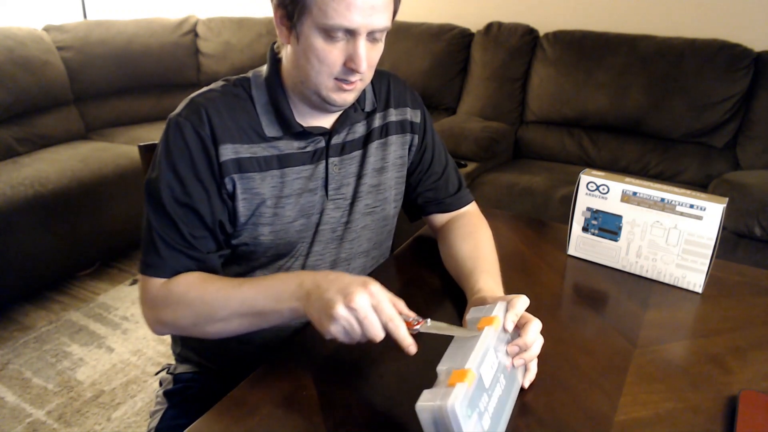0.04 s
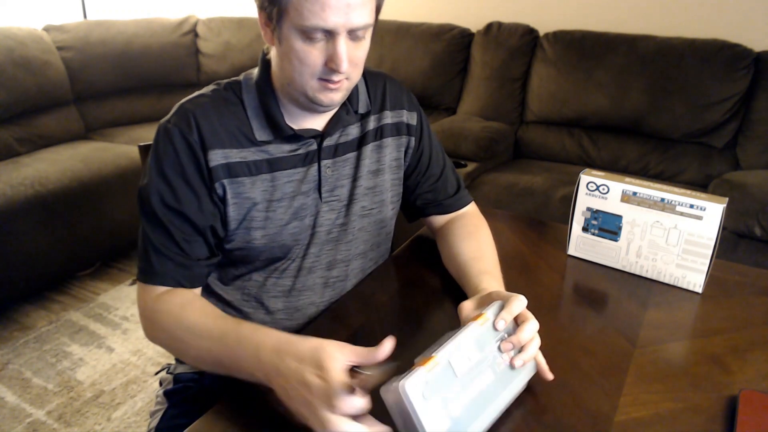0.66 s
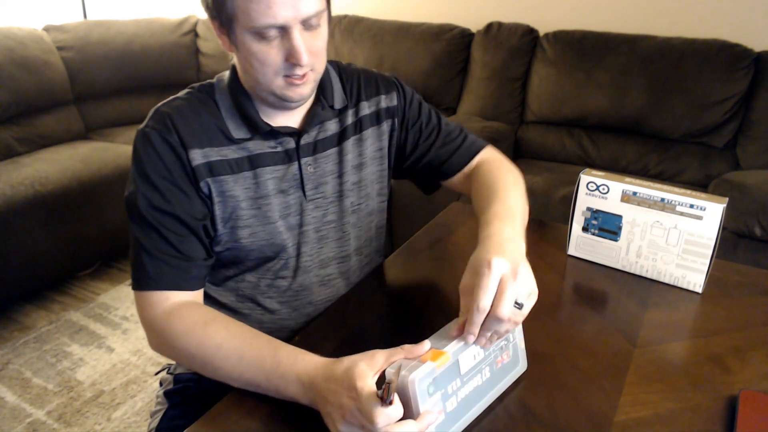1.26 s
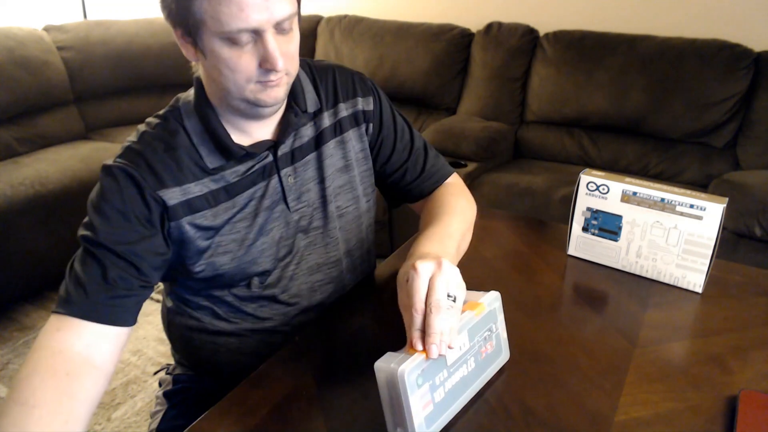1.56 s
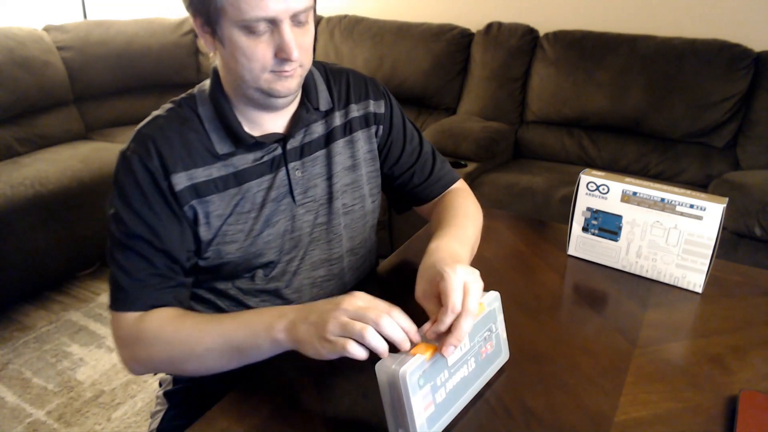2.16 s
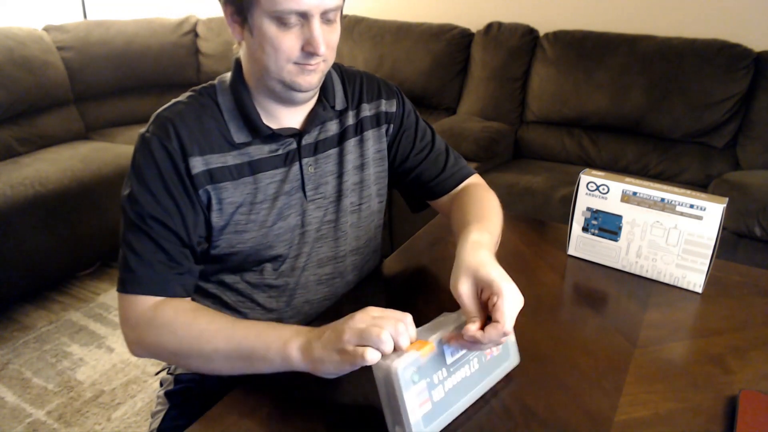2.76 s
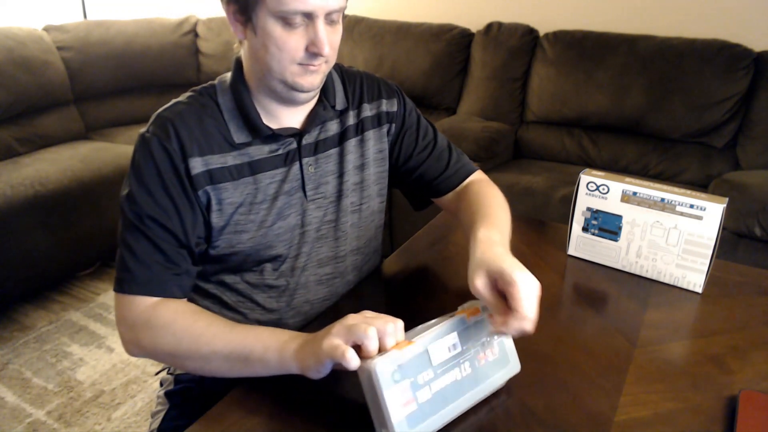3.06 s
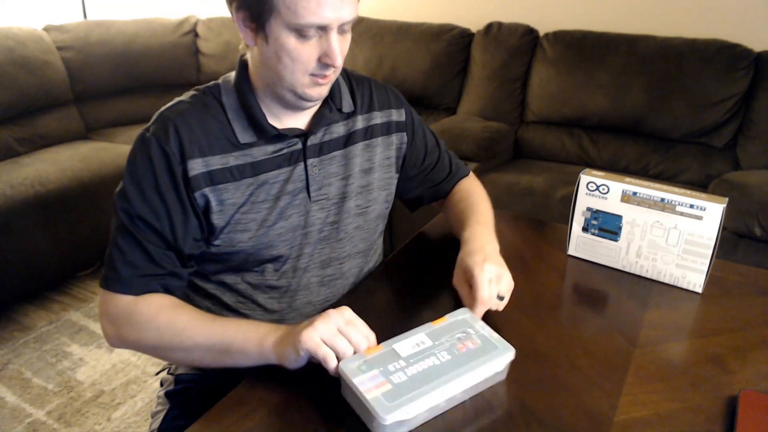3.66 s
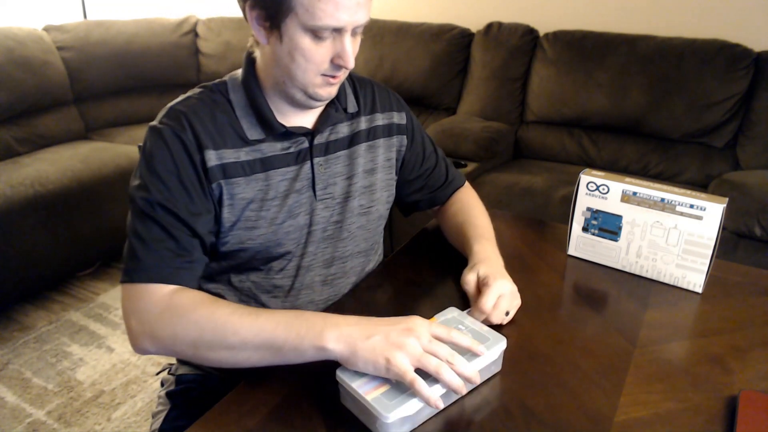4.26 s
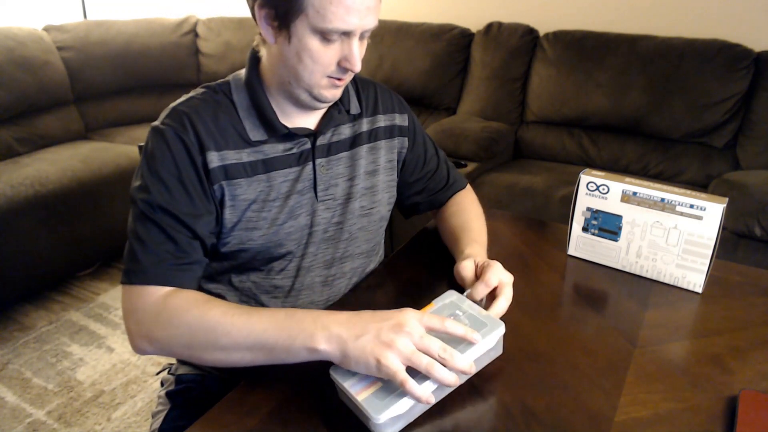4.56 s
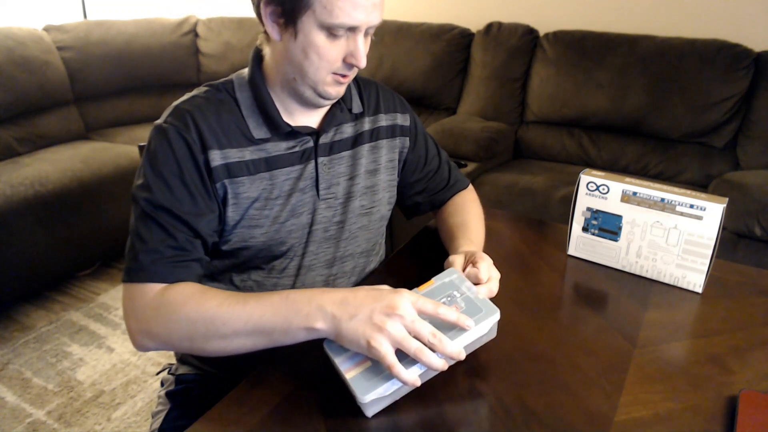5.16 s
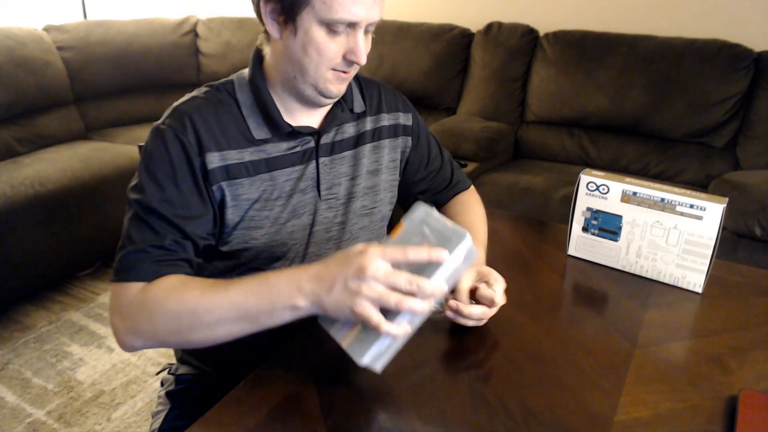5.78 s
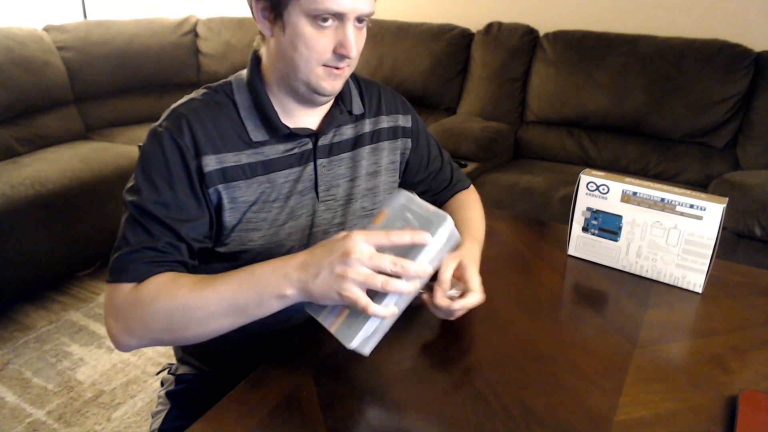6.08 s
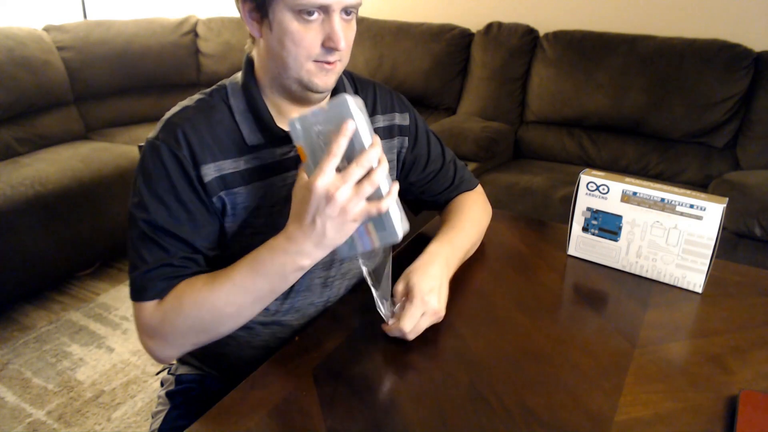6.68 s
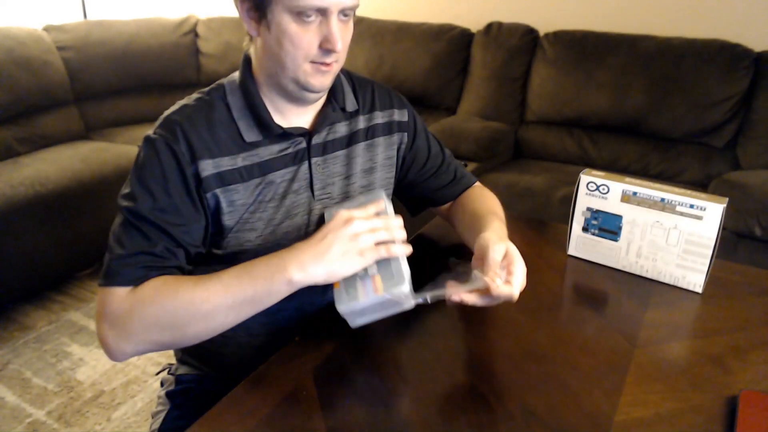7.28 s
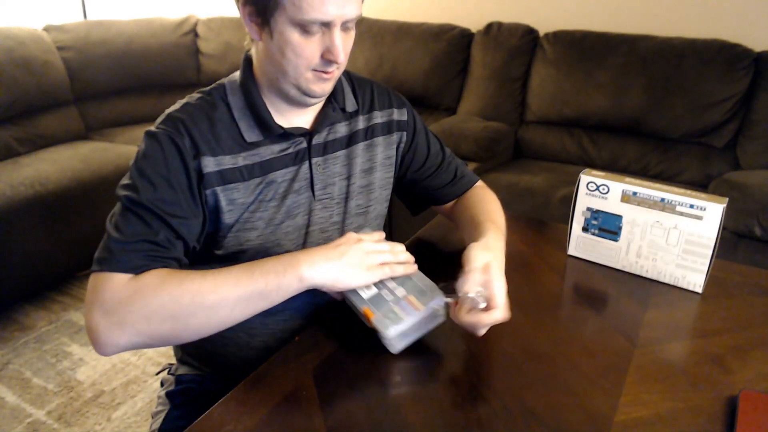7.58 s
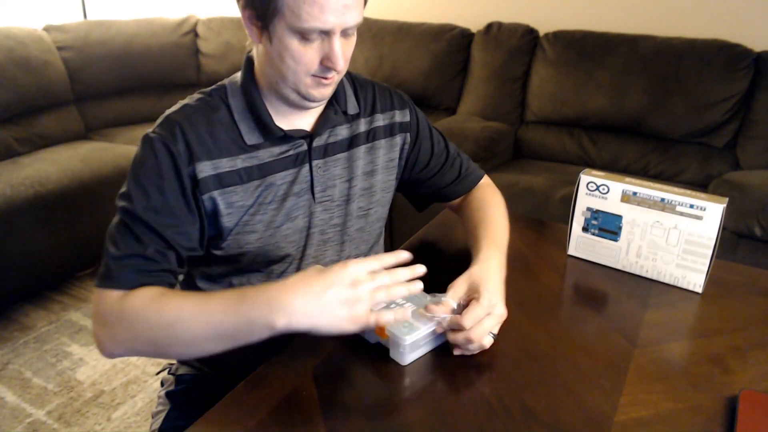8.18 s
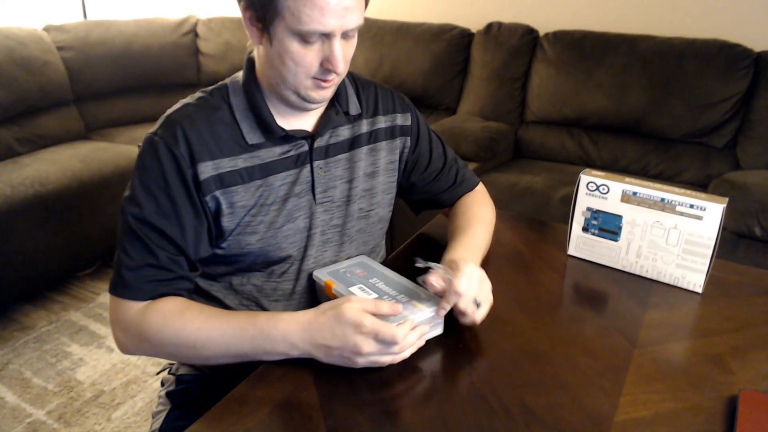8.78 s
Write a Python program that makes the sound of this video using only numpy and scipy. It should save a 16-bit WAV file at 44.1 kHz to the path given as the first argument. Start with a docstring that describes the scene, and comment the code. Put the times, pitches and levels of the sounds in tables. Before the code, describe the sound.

A hard plastic case is handled on a wooden table in a quiet room. It knocks down once, a knife is laid aside with a faint tick, and the stiff shell gives sharp snaps and hollow clacks as it is turned and shoved. In the second half, thin plastic wrapping is peeled off with crackles and short rasps, then crumpled. A low ventilation hum runs underneath, heard in narrow stereo.

```python
"""Unwrapping a plastic case

A hard plastic organizer case knocks and rocks on a wooden table in a living room. Its latches
and walls snap, fingers rub and shove it, and a knife is laid aside with a few light taps.
The clear wrapping is peeled off and crumpled, crackling as its creases flip over.
Two closely spaced microphones hear it all over a low ventilation hum."""
import sys
import numpy as np
from scipy import signal
from scipy.fft import rfft, irfft, next_fast_len
from scipy.io import wavfile
from scipy.ndimage import map_coordinates

SR = 44100
rng = np.random.default_rng(int(sys.argv[2]) if len(sys.argv) > 2 else 0)


def digitize_waveform(pressure):
    """Quantize a signal to 16-bit integers and store it at the path in sys.argv[1].

    Rows of a 2-D input are taken as channels; values are limited to [-1, 1].
    """
    field = np.atleast_2d(pressure).T
    bounded = np.clip(field, -1, 1)
    quanta = np.round(bounded * 32767).astype(np.int16)
    wavfile.write(sys.argv[1], SR, quanta)


N = 398223

# The case lands on the table. Each row: start in seconds, thud pitch in Hz, relative levels in dB of
# the thud, the case's hollow, its wall and its edge, rattle in dB above the first click,
# first bounce time in seconds, loss per bounce in dB.
KNOCKS = [(0.543, 333, -27, -29.5, -29, -39.5, -1, 0.011, 19),
          (0.5762, 146, -13.5, -24.5, -24, -36.5, -9, 0.062, 14.5),
          (1.3592, 326, -37.5, -28, -31, -50, 15, .016, 0.05),
          (3.4034, 200, -28.5, -19, -24.5, -28.5, -6, .0203, 10.5),
          (3.449, 230, -31, -34.5, -33.5, -32.5, -14, 0.04, 5),
          (3.5308, 72, -28, -33.5, -41.5, -46, 18, .02, 8),
          (4.2378, 185, -19, -20.5, -22.5, -34.5, 0, 0.011, 6.5),
          (5.0251, 229, -26, -29.5, -28.5, -47.5, 17, .0112, 6),
          (5.385, 174, -19, -21.5, -22, -34, 0, .031, 21),
          (5.3953, 334, -19.5, -26, -30, -39.5, 8, .011, 15),
          (6.9231, 126, -56, -32.5, -30, -41.5, 3, 0.011, 4),
          (7.09, 146, -57, -30, -47, -72, -19, 0.016, 17),
          (7.498, 91.5, -29, -26.5, -22, -41.5, -5, 0.0037, 5.5),
          (7.5806, 193, -31, -36, -31.5, -40, 0, 0.035, 14), (7.751, 72, -33.5, -51, -60, -79, 7, 0.036, 6),
          (8.454, 256, -24.5, -26.5, -27, -40, -1, .0054, 6.5)]
# Latches, walls and tight wrapping snap. Each row: start in seconds, relative levels in dB of hollow,
# wall and edge, rattle in dB above the first click, second click in dB below the snap.
SNAPS = [(0.001, -42.5, -40.5, -53.5, 0, 12), (0.4888, -67, -60, -54, -5, 11),
         (2.1736, -44.5, -37, -38.5, 0, 2), (2.2006, -45, -43, -34, 8, 18),
         (2.3918, -62, -39.5, -34, 0, 7.5), (2.5915, -56, -42.5, -43, 3, 23),
         (2.6117, -41.5, -34, -34.5, 19, 27), (2.6666, -27, -23, -22.5, 4.5, 21),
         (2.9242, -68, -62, -41, 22, 21), (2.9588, -64, -46.5, -37.5, -1, 11),
         (3.0269, -53, -55, -42.5, 7, 26), (3.1981, -57, -55, -56, 8, 5), (3.2925, -63, -50, -41.5, -3, 12),
         (3.3576, -42, -28, -38, 2, 9), (3.3958, -30.5, -41, -33.5, -3, 18),
         (3.4672, -29.5, -29, -37.5, 10, 8), (3.7044, -77, -45, -28.5, 1, 18),
         (3.9369, -47, -39.5, -39.5, 11, 4), (4.2911, -34, -36, -37, -4, 9),
         (5.254, -34, -23, -19.5, 2.5, 29), (5.3128, -33, -36, -34, 12, -2),
         (5.4857, -38, -37, -40.5, -1, 13), (5.8465, -62, -49.5, -60, 7, 14),
         (6.3726, -42.5, -34, -32.5, 2, 2), (6.6733, -44, -33, -36.5, 1, 16),
         (6.943, -51, -31.5, -39, -9, 24), (6.9776, -57, -33.5, -52, -12, 21),
         (7.3626, -52, -32.5, -34, -1, 16), (8.1177, -54, -51, -45.5, 17, 2),
         (8.2723, -59, -40.5, -41, 6, -1)]
# Single crackles of the wrapping that stand out, loud or faint.
# Each row: start in seconds, relative level in dB, pitch in Hz.
CREASES = [(1.02, -69, 3300), (2.992, -48, 3530), (4.4789, -53, 3050), (4.6513, -53, 7450),
           (4.7992, -64, 3872), (4.8867, -60, 3620), (5.191, -46.5, 4300), (5.6004, -40.5, 4500),
           (6.0054, -45.5, 3730), (6.1285, -45, 3570), (6.2212, -41.5, 3055), (6.235, -41.5, 2770),
           (6.5197, -36.5, 3180), (6.5924, -42, 3560), (7.0058, -33.5, 3000), (7.072, -32.5, 3480),
           (7.167, -42, 5130), (7.2062, -39.5, 5000), (7.9484, -48, 4500), (8.0297, -46.5, 4080),
           (8.2974, -33.5, 3820), (8.3679, -39.5, 3250), (8.6441, -40, 4830), (8.7169, -35.5, 4000),
           (8.8571, -44.5, 3470)]
# The pull on the wrapping, peeled and then crumpled. Each row: time in seconds, strength in dB.
PEEL = [(5.7, -80), (5.9, -66.5), (6.05, -53), (6.38, -53.5), (6.54, -47.5), (6.75, -62.5), (6.96, -57),
        (7.1, -51), (7.19, -46), (7.41, -50.5), (7.71, -57), (7.9, -64)]
CRUMPLE = [(7.92, -66), (8.244, -54), (8.45, -38), (8.532, -46), (8.748, -49), (8.93, -46.5), (9.03, -65)]
# Strokes of peeling and rubbing. Each row: start in seconds, length in seconds (short ones get
# stretched), middle pitch in Hz, width in octaves, relative level in dB.
RASPS = [(0.485, 0.086, 705, 0.34, -46), (0.732, 0.37, 2740, 0.13, -67), (0.797, .28, 3700, .05, -78),
         (0.856, 0.17, 5500, 0.054, -73), (4.92, 0.2, 5430, 0.056, -59.5), (4.925, 0.34, 6620, 0.076, -60),
         (5.55, 0.077, 980, 0.18, -41.5), (5.822, 0.13, 4700, 0.4, -48.5), (5.997, 0.36, 3400, 0.24, -51),
         (6.028, 0.13, 715, .09, -48), (6.193, .25, 2010, 0.73, -40), (6.495, 0.084, 1030, .99, -41.5),
         (7.05, 0.11, 810, 0.37, -34), (7.233, .14, 5500, 0.36, -40), (7.33, 0.12, 1320, 0.21, -39),
         (8.093, 0.079, 1290, 0.41, -40), (8.233, 0.068, 1070, 0.11, -37.5), (8.324, 0.077, 910, 0.21, -38)]
# Shoves of the case. Each row: time of the hardest push in seconds, relative level in dB.
SHOVES = [(0.52, -51), (2.33, -59), (2.64, -56), (3.42, -35.5), (3.57, -49.5), (4.33, -39.5), (5.02, -51.5),
          (5.42, -30), (6.12, -61), (6.36, -42), (6.69, -43), (7.0, -47), (7.58, -40), (8.06, -57),
          (8.45, -40.5), (8.75, -51.5)]
# The notes the case rings at. Each row: pitch in Hz, width in Hz, boost in dB.
CASE_MODES = [(364.7, 4.1, 9), (468, 49, 7), (642, 18.7, 11), (694, 26.5, 4.5), (748, 30, -1),
              (879.4, 14, 12), (948, 46, 7), (1070, 56, 5), (1185, 26, 5.5), (1292, 20, 7.5),
              (1657, 100, 4), (2090, 530, 4), (2353, 66, 5.5), (3130, 270, 4), (4696, 79, 6.5),
              (5000, 77, -0.5)]
# The notes of the table top. Each row: pitch in Hz, relative level in dB, seconds to fade by 60 dB.
TABLE_MODES = [(54, -5, 0.18), (74, -15, 0.22), (135.5, -8, 0.22), (157, 2.5, 0.076), (216.4, 0.5, 0.18),
               (255, 8.5, 0.11), (373.6, 8.5, 0.15)]
# Tone colours, from bass to treble. Each row: frequency in Hz, gain in dB.
HOLLOW_COLOUR = [(60, -10), (200, -20), (320, -8.5), (520, -4), (800, 2.5), (1100, -29.5), (2000, -53),
                 (6000, -73)]
WALL_COLOUR = [(100, -44), (500, -29.5), (950, 3), (1400, 3.5), (2100, -1.5), (3000, -3.5), (6000, -38),
               (16000, -42)]
EDGE_COLOUR = [(200, -98), (1400, -14), (2700, -0.5), (4000, -1), (5000, -3), (7000, -6), (8300, -14.5),
               (12000, -17.5), (15500, -20.5)]
FILM_COLOUR = [(200, -9), (800, -3.5), (1700, -10), (2400, -2.5), (3400, -1.5), (5000, -1), (7100, -0.5),
               (8300, -12), (11000, -12.5), (12200, -18), (15500, -16)]
SLIDE_COLOUR = [(100, 6), (400, 3), (900, 0.5), (1400, 3), (2200, -6.5), (4000, -55), (12000, -64.5)]
ROOM_COLOUR = [(40, -2.5), (130, 3.5), (300, 3), (700, 3.5), (2000, 7), (6000, 4), (15000, 3)]
VENT_COLOUR = [(12, -15.5), (20, -7.5), (52, -10.5), (86, -15), (163, -2), (248, -11), (310, -13),
               (347, -11), (558, -16), (607, -23.5), (678, -18), (2140, -47), (2750, -41), (5680, -46.5),
               (16000, -64)]
# The tones of the ventilation. Each row: pitch in Hz, relative level in dB.
HUM_TONES = [(53.8, -55.5), (118.4, -53), (236.9, -54), (263.8, -59), (344.5, -51.5), (382.2, -84)]
# The low background swells and sinks. Each row: time in seconds, relative level in dB.
BACKGROUND_LEVELS = [(0.0, -43.5), (0.55, -44.5), (0.73, -47.5), (1.91, -52.5), (3.42, -45.5), (3.59, -42),
                     (4.85, -44), (5.31, -40), (5.71, -44.5), (7.74, -40), (7.82, -41.5), (9.03, -41.5)]
# How alike echoes are at the two microphones. Each row: frequency in Hz, likeness from 0 to 1.
MIC_LIKENESS = [(100, 0.93), (250, 0.92), (500, 0.94), (1000, 0.74), (2000, 0), (5000, 0)]

RING = np.arange(16384) / SR  # the time axis of one short sound, in seconds


def knocks(contacts=4, bounce_shrink=0.86):
    """The case bounces ever faster and weaker; each time, the table thuds and the shell clacks."""
    parts, out = shell_parts(contact_hz=2020), np.zeros((2, N))
    for s, pitch, thud_db, *levels_db, rattle_db, flight_s, loss_db in KNOCKS:
        table = in_room(amp(thud_db) * np.tile(thud(pitch), (2, 1)), wet_db=-6)
        for k in range(contacts):
            shell = shell_hit(parts, levels_db, t60=0.029, rattle_db=rattle_db, wet_db=-1)
            add(out, s, amp(-k * loss_db) * (table + shell))
            s += flight_s * bounce_shrink ** k
    return out


def thud(pitch):
    """The table top swings at a few low notes; the spot that is hit favours those near one pitch."""
    swing = sum(amp(db) * bump(hz, pitch, octaves=0.43) * fade(RING, t60) * np.sin(2 * np.pi * hz * RING)
                for hz, db, t60 in TABLE_MODES)
    return -blow(swing)


def snaps(tick_s=0.004, tick_loss_db=21.5, click_s=0.021):
    """Stiff plastic snaps: a faint tick, a short crack, then a second click a moment later."""
    parts, out = shell_parts(contact_hz=4000), np.zeros((2, N))
    for s, *levels_db, rattle_db, click_loss_db in SNAPS:
        for delay, loss_db in [(-tick_s, tick_loss_db), (0, 0), (click_s, click_loss_db)]:
            crack = shell_hit(parts, levels_db, t60=0.024, rattle_db=rattle_db, wet_db=-3)
            add(out, s + delay, amp(1 - loss_db) * crack)
    return out


def shell_hit(parts, levels_db, t60, rattle_db, wet_db):
    """One hit on the case; where it lands decides how much hollow, wall and edge each ring."""
    power = amp(levels_db) ** 2
    colour = causal(lambda hz: np.sqrt(power @ parts))
    return np.sqrt(power.sum()) * strike(colour, t60, rattle_db, wet_db)


def shell_parts(contact_hz):
    """Power of hollow, wall and edge at each frequency; a soft hit barely stirs the wall's high notes."""
    hz = np.fft.rfftfreq(len(RING), 1 / SR)
    soft = 1 / (1 + (hz / contact_hz) ** 6)
    gains = case_gain(HOLLOW_COLOUR, hz), case_gain(WALL_COLOUR, hz) * soft, case_gain(EDGE_COLOUR, hz)
    return np.array([unit(gain) ** 2 for gain in gains])


def case_gain(colour, hz):
    """A broad tone colour with the case's own notes standing out of it."""
    peaks = sum((amp(db) - 1) / (1 + (2 * (hz - f) / width) ** 2) for f, width, db in CASE_MODES)
    return shape(colour, hz) * (1 + peaks)


def strike(colour, t60, rattle_db, wet_db, uneven_db=3, spacing_hz=140):
    """A sharp click, the dense ringing of a stiff shell, then the room, all in the given colour."""
    ringing = diffuse(len(RING)) * fade(RING, t60) * (1 - np.exp(-RING / 0.0004))
    click = blow(1.0 * (RING == 0))
    direct = blow(click + amp(rattle_db) * blow(ringing))
    heard = direct + amp(wet_db) * blow(reflections())
    # Each spot that is hit brings out different ones of the many close notes.
    favour = rng.standard_normal(size=1024)
    spot = causal(lambda hz: amp(uneven_db * map_coordinates(favour, [hz / spacing_hz], order=1)))
    return blow(irfft(rfft(heard) * colour * spot)) * np.hypot(1, amp(wet_db))


def wrapping(strain_below_edge_db=18, holding_db=-96):
    """The film crackles in clumps as it is pulled or strained around a snap, and faintly when held."""
    strains = [(s, edge_db - strain_below_edge_db) for s, _, _, edge_db, *_ in SNAPS]
    strain_db = np.maximum(swells(strains, rise_db_per_s=311, fall_db_per_s=125), holding_db)
    crinkle_db = np.maximum(strain_db, pull(np.arange(N) / SR) - 1.2)
    flips = grains(per_second=260, spread_db=11, t60=0.004)
    crackle = unit(filtered(flips, lambda hz: shape(FILM_COLOUR, hz))) * amp(crinkle_db)
    clumps = amp(3.5 * wobble(30))
    return in_room(crackle * clumps, wet_db=-3)


def creases(extra_count=32, above_pull_db=1.5, typical_hz=4100):
    """Creases flip and ring at their own pitch; extra ones come at random, louder with a harder pull."""
    times = rng.uniform(PEEL[0][0], CRUMPLE[-1][0], extra_count)
    extra = [(s, pull(s) + above_pull_db, typical_hz * rng.lognormal(0, 0.27)) for s in times]
    out = np.zeros((2, N))
    for s, db, pitch in extra + list(CREASES):
        colour = causal(lambda hz: shape(FILM_COLOUR, hz) * (1 + 1.7 * bump(hz, pitch, octaves=0.26)))
        add(out, s, amp(db) * strike(colour, t60=0.0061, rattle_db=2, wet_db=0))
    return out


def pull(s):
    """The pull on the wrapping in dB at time s; none before the peeling starts."""
    return np.interp(s, *np.vstack([PEEL, CRUMPLE]).T, left=-120)


def rasps(sink_share=0.66):
    """Peeling and rubbing strokes stick and slip; the pitch of each sinks by a share of its width."""
    slips, out = grains(per_second=700, spread_db=4, t60=0.0096), np.zeros((2, N))
    for s, length, pitch, octaves, db in RASPS:
        samples = max(round(length * SR), len(RING) // 8)
        hz, t, spectrum = signal.stft(slips[:, round(s * SR):][:, :samples], SR, nperseg=512)
        glide = pitch * 2 ** (sink_share * octaves * np.linspace(0.5, -0.5, len(t)))
        band = spectrum * bump(hz[:, None], glide, octaves)
        stroke = unit(signal.istft(band, SR, nperseg=512)[1])
        add(out, s, amp(db - 2.5) * stroke * signal.windows.tukey(stroke.shape[1], 0.5))
    return in_room(out, wet_db=-8)


def sliding():
    """With each shove, fingers and film stick and slip on the case and set its walls ringing."""
    holding_db = -65.5 + 1.3 * background_swell()  # the faint rub of just holding the case
    slide_db = np.maximum(swells(SHOVES, rise_db_per_s=165, fall_db_per_s=201), holding_db)
    slips = grains(per_second=400, spread_db=2, t60=0.033)
    rub = unit(filtered(slips, lambda hz: case_gain(SLIDE_COLOUR, hz)))
    pressure_db = 1.5 * wobble(14)
    return in_room(rub * amp(slide_db + pressure_db), wet_db=-1)


def knife(touches=4, start_s=1.956, gap_s=0.022, first_db=-51, loss_db=2):
    """The blade taps the wood lightly, weaker each time, damped by the hand."""
    blade = causal(lambda hz: bump(hz, 2970, octaves=0.11) + 0.27 * bump(hz, 4000, octaves=0.1)
                   + 0.036 * shape(FILM_COLOUR, hz))
    out = np.zeros((2, N))
    for k in range(touches):
        touch = strike(blade, t60=0.028, rattle_db=6, wet_db=-4.5)
        add(out, start_s + k * gap_s, amp(first_db - k * loss_db) * touch)
    return out


def ventilation(rush_db=-45):
    """A low rush of air with a few tones that waver in level and pitch."""
    t = np.arange(N) / SR
    rush = amp(rush_db) * unit(filtered(diffuse(N), lambda hz: shape(VENT_COLOUR, hz)))
    tones = np.zeros(N)
    for hz, db in HUM_TONES:
        level = np.sqrt(2) * amp(db + 3.3 * wobble(6))
        tones += level * np.sin(2 * np.pi * hz * t + 1.64 * wobble(18))
    return (rush + tones) * amp(background_swell())


def background_swell():
    """How far the low background is above or below its usual level, in dB."""
    level_db = np.interp(np.arange(N) / SR, *np.transpose(BACKGROUND_LEVELS))
    return level_db - np.median(level_db)


def in_room(x, wet_db):
    """A sound together with the room's echoes; wet_db sets how loud they are."""
    return x + amp(wet_db) * signal.fftconvolve(x[:1], reflections(), axes=1)[:, :x.shape[1]]


def reflections(t60=0.28):
    """A fresh tail of room echoes that builds up in a few milliseconds and dies away."""
    tail = diffuse(len(RING)) * fade(RING, t60) * (1 - np.exp(-RING / 0.0024))
    return filtered(tail / np.linalg.norm(tail[0]), lambda hz: shape(ROOM_COLOUR, hz))


def diffuse(size):
    """Noise from all sides: alike at both microphones in the bass, unrelated in the treble."""
    alike = np.interp(np.fft.rfftfreq(size, 1 / SR), *np.transpose(MIC_LIKENESS))
    alike = np.clip(alike, -0.99, 0.99)
    mid, side = irfft(rfft(rng.standard_normal((2, size))) * np.sqrt([1 + alike, 1 - alike]), size)
    return unit(np.array([mid + side, mid - side]))


def grains(per_second, spread_db, t60):
    """Tiny slips at random moments and of unequal size, each ringing briefly."""
    chance, size = rng.random(N), np.clip(rng.standard_normal(N), -2, 2)
    slips = (chance < per_second / SR) * amp(spread_db * size) * rng.choice([-1, 1], N)
    ring_level = np.sqrt(np.abs(signal.fftconvolve(slips ** 2, fade(RING, t60) ** 2)[:N]))
    return unit(unit(slips) + unit(ring_level * diffuse(N)))


def swells(peaks, rise_db_per_s, fall_db_per_s):
    """Level in dB of efforts that build up to each (seconds, dB) peak and relax again."""
    t = np.arange(N) / SR
    efforts = [db - np.maximum((s - t) * rise_db_per_s, (t - s) * fall_db_per_s) for s, db in peaks]
    return np.max(efforts, axis=0)


def wobble(per_second):
    """A smooth curve through this many random values a second."""
    values = rng.standard_normal(int(N * per_second / SR) + 4)
    return map_coordinates(values, [np.arange(N) * per_second / SR], order=2)


def filtered(x, response):
    """Turn each frequency of x up or down by the gain that response gives it."""
    n = x.shape[-1]
    padded = next_fast_len(n + 2048)
    return irfft(rfft(x, padded) * response(np.fft.rfftfreq(padded, 1 / SR)), padded)[..., :n]


def causal(response):
    """Turn gains into a filter spectrum that rings only after the hit (minimum phase)."""
    cepstrum = irfft(np.log(response(np.fft.rfftfreq(len(RING), 1 / SR)) + 1e-6))
    half = len(RING) // 2
    cepstrum[1:half] *= 2
    cepstrum[half + 1:] = 0
    return np.exp(rfft(cepstrum))


def shape(points, hz):
    """Gain along a line that joins (Hz, dB) points, with octaves evenly spaced."""
    f, db = np.transpose(points)
    return amp(np.interp(np.log(hz + 1), np.log(f), db))


def bump(hz, centre, octaves):
    """Gain of one rounded peak around a centre pitch."""
    return 1 / (1 + (np.log2((hz + 1) / centre) / octaves) ** 2)


def fade(t, t60):
    """Die away by 60 dB every t60 seconds."""
    return np.exp(-np.log(1000) * t / t60)


def amp(db):
    """Turn decibels into a gain."""
    return 10 ** (np.asarray(db) / 20)


def unit(x):
    """Scale to an average level (rms) of 1."""
    return x / np.sqrt(np.mean(x ** 2) + 1e-20)


def blow(x):
    """Give a hit the energy of 20 ms of sound at level 1."""
    return x * np.sqrt(0.02 * SR / np.mean(np.sum(x ** 2, axis=-1)))


def add(track, s, sound):
    """Mix a sound in at s seconds."""
    start = round(s * SR)
    part = sound[..., max(-start, 0):max(N - start, 0)]
    track[..., max(start, 0):][..., :part.shape[-1]] += part


def scene():
    """The hands work slightly off centre, so their sound reaches the right microphone first."""
    left, right = knocks() + snaps() + knife() + wrapping() + creases() + sliding() + rasps()
    left = np.pad(left, (2, 0))[:N]  # two samples later
    return np.array([left * amp(0.87), right * amp(-0.27)]) + ventilation()


def record(dry, ceiling=0.95, top_hz=15900):
    """Round off the highest peaks and cut away the very top of the treble."""
    rounded = dry / (1 + (dry / ceiling) ** 8) ** (1 / 8)
    return filtered(rounded, lambda hz: 1 / np.sqrt(1 + (hz / top_hz) ** 160))


dry = scene()
out = record(dry)
digitize_waveform(out)
```